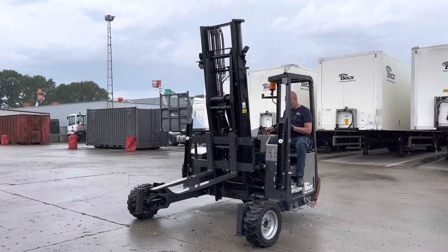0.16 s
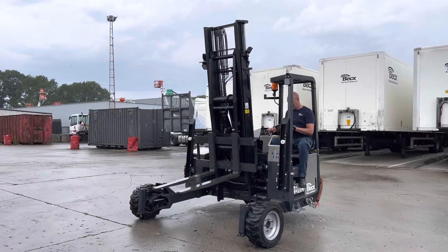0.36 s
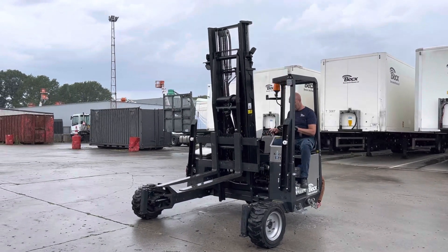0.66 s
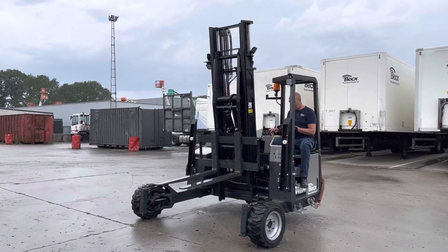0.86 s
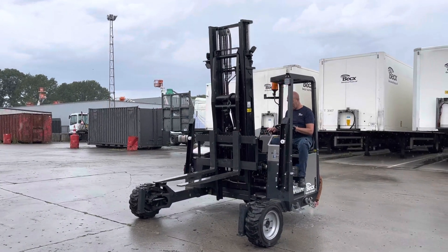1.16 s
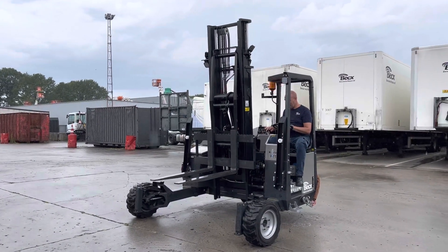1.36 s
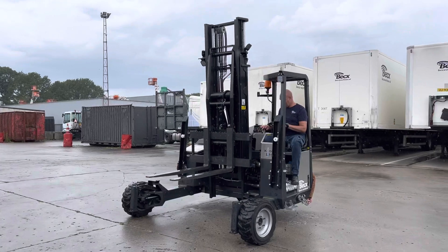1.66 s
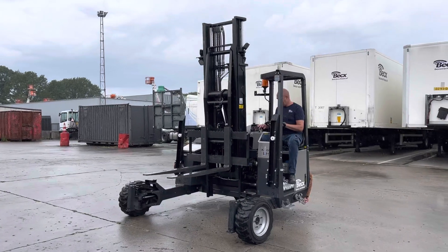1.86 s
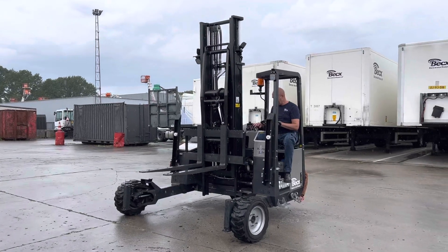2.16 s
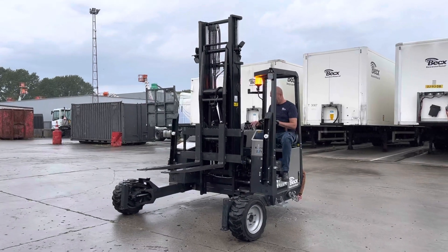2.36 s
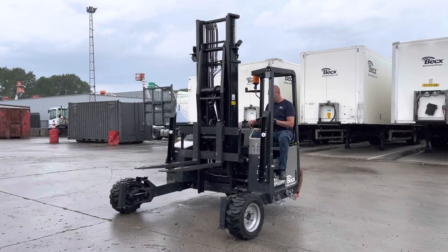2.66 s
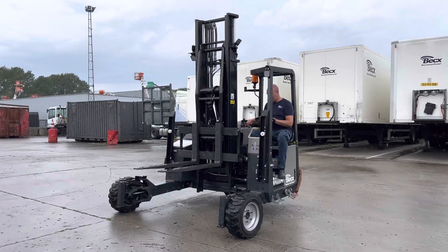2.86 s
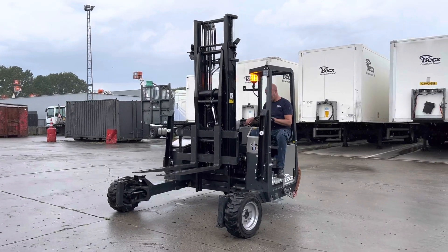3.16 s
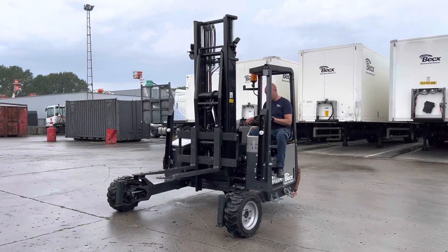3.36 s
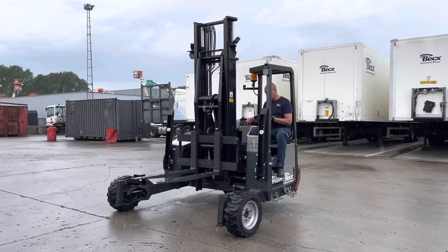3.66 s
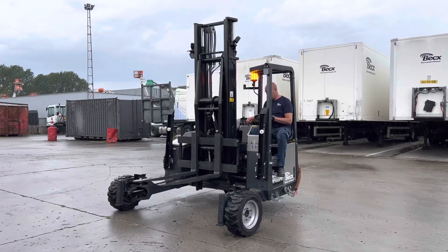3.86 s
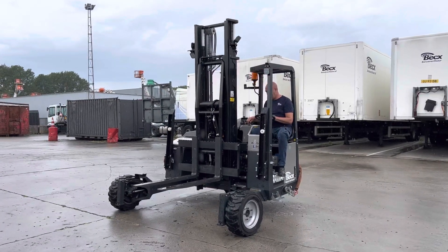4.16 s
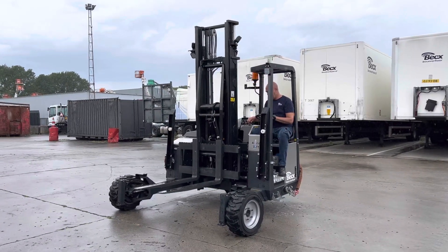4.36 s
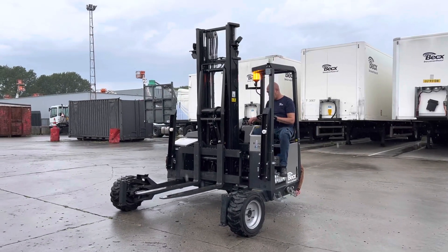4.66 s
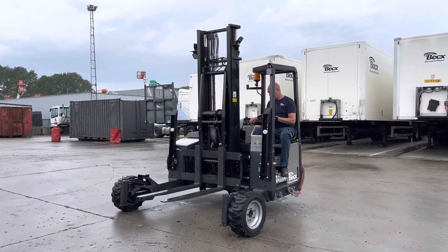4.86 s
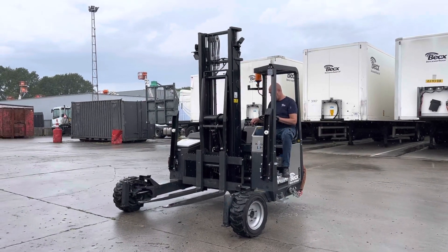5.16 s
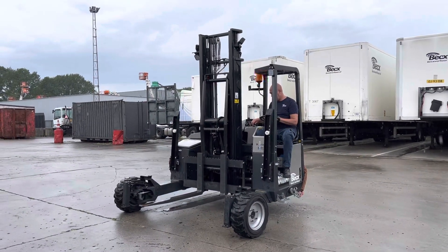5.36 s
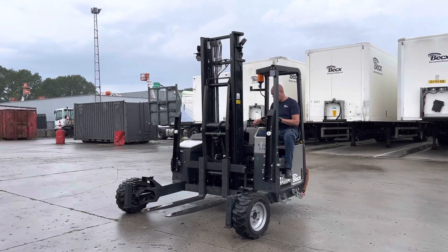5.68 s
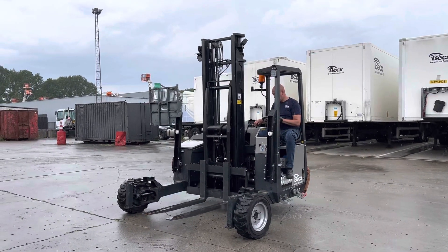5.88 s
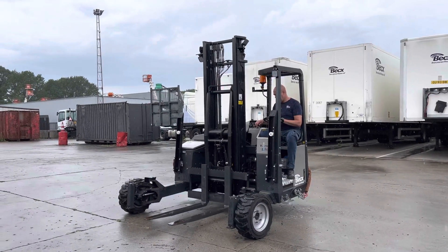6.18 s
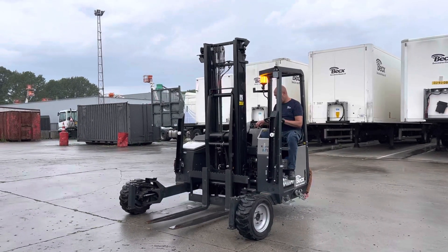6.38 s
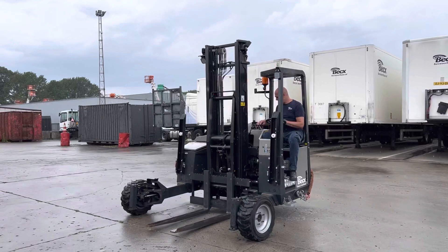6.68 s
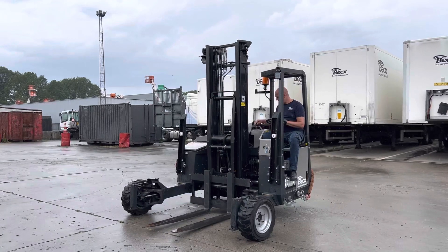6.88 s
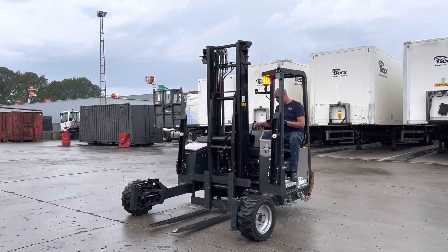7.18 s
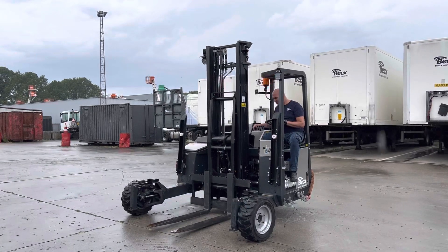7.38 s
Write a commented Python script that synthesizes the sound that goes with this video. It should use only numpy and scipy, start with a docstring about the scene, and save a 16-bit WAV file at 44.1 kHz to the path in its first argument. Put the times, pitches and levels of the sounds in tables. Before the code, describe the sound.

In an open concrete yard, a small three-cylinder diesel forklift runs a few metres from a stereo microphone. From 0 s the engine throbs low and clatters, its speed dropping slightly in the first quarter second, then steady. A gear pump whines raggedly with the firings, with brief gliding tones up to about 1.2 s. Near 2.4 s the valve shuts with a short spurt and the unloaded engine flares, peaking at 2.6 s. From 2.7 s oil hisses brightly through the valve, with a thin, slowly weakening high whistle, gurgling tones and rising squeals between 3.3 and 5.4 s. Small ticks fall at 3.5, 4.2, 5.9 and 6.4 s. At 6.6 s a soft, duller knock sounds as the hiss closes; the engine flares again around 6.8 s, then settles, loading slightly near 7.5 s. Faint low wind puffs come near 0.8, 3.4, 4.9 and most clearly 5.4 s.

```python
"""A small three-cylinder diesel forklift works in an open concrete yard, a few metres from a microphone pair.
First the engine throbs and clatters, all timed by its firings, and the gear pump whines as the forks rise,
with brief gliding tones. The lift valve shuts with a spurt and the unloaded engine flares; then the forks
sink while oil, as shaped noise and wandering tones, hisses, whistles and squeals through the valve. The mast
stops with a soft knock and the engine flares again. Puffs of light wind touch the microphone."""
import sys
import numpy as np
from scipy import signal
from scipy.fft import rfft, irfft, next_fast_len
from scipy.io import wavfile

SR = 44100
rng = np.random.default_rng(int(sys.argv[2]) if len(sys.argv) > 2 else 0)


def pcm_store(signal):
    """Save signal as 16-bit PCM."""
    levels = np.round(np.clip(np.atleast_2d(signal), -1, 1) * 32767)
    wavfile.write(sys.argv[1], SR, levels.astype(np.int16).T)


N = 332073


def from_db(db):
    """Decibels to gain."""
    return 10 ** (np.asarray(db) / 20)


def rms_one(x):
    """Scale to unit power."""
    return x / np.sqrt(np.mean(x ** 2) + 1e-20)


def clock():
    """Time of every sample in seconds."""
    return np.arange(N) / SR


def in_time(rows):
    """Draw a curve of (seconds, value) points through every sample."""
    seconds, values = np.transpose(rows)
    return np.interp(clock(), seconds, values)


def at_hz(points, hz):
    """Read a table on a log-frequency axis."""
    table_hz, values = np.transpose(points)
    return np.interp(np.log(hz + 1e-9), np.log(table_hz), values)


def lagged(x, lag_s):
    """Follow a control with some inertia."""
    r = np.exp(-1 / (lag_s * SR))
    return signal.lfilter([1 - r], [1, -r], x)


def drift(rate):
    """Slow chance wander of rms 1, changing about rate times a second."""
    step = 40  # samples between the points of the wander
    r = np.exp(-2 * np.pi * step * rate / SR)
    noise = rng.standard_normal(N // step + 2002)
    slow = signal.lfilter([1], [1, -2 * r, r * r], noise)[2000:]  # settled part only
    return np.interp(np.arange(N) / step, np.arange(len(slow)), rms_one(slow))


def band(x, low_hz, high_hz):
    """Butterworth band-pass."""
    edges_hz = [low_hz, min(high_hz, SR / 2 - 1000)]
    return signal.sosfilt(signal.butter(2, edges_hz, "band", fs=SR, output="sos"), x)


# Left-right likeness at the microphone pair. Each row: frequency in Hz, likeness (1 = the same).
LIKENESS = [(60, .95), (150, .97), (350, .78), (800, .7), (1500, .4), (2800, .7), (4300, .75), (5700, .4),
            (7400, .8), (10000, .95), (12000, .8), (15000, .85)]


def coloured_noise(spectrum):
    """Stereo noise of rms 1; reflections from the yard make the channels partly unlike."""
    size = next_fast_len(N)
    hz = np.arange(size // 2 + 1) * SR / size
    white = rfft(rng.standard_normal((2, size)))
    mid, side = white * from_db(at_hz(spectrum, hz)) * (hz > 20)
    alike = np.clip(at_hz(LIKENESS, hz), -1, 1)
    pair = np.sqrt(1 + alike) * mid + np.sqrt(1 - alike) * side * [[1], [-1]]
    return rms_one(irfft(pair, size)[:, :N])


def unsteady_tone(hz, width_hz):
    """A tone whose strength and phase wander, rms 1."""
    angle = 2 * np.pi * np.cumsum(hz * np.ones(N)) / SR
    return rms_one(drift(width_hz / 2) * np.cos(angle) + drift(width_hz / 2) * np.sin(angle))


def singing(tones, waver=0.0, swell_db=0.0):
    """Narrow resonances kept ringing; each may wander in pitch (as a share) and strength."""
    out = np.zeros(N)
    for hz, width_hz, db in tones:
        tone = unsteady_tone(hz * (1 + waver * drift(3)), width_hz)
        out += from_db(db + swell_db * drift(2.2)) * tone
    return out


def stroke(start, end, open_s, close_s):
    """Envelope that opens, holds and closes (0-1), like one pull of a lever."""
    return np.clip((clock() - start) / open_s, 0, 1) * np.clip((end - clock()) / close_s, 0, 1)


# Wind puffs at the microphone.
# Each row: middle in seconds, time to fall to 1/e on either side in seconds, level in dB.
WIND_PUFFS = [(.76, .07, -33), (3.36, .09, -36), (4.87, .07, -35), (5.42, .18, -27.5)]


def wind(own_share=0.27):
    """Soft puffs rumble on the microphone, a little differently at each port."""
    strength = sum(from_db(db) * np.exp(-((clock() - s) / length) ** 2) for s, length, db in WIND_PUFFS)
    eddies = rng.standard_normal(N) + own_share * rng.standard_normal((2, N))
    return strength * rms_one(band(eddies, low_hz=42.7, high_hz=105.0))


# Small knocks and ticks of the machine.
# Each row: start in seconds, level in dB, centre in Hz, width in octaves, decay to 1/e in seconds.
CLUNKS = [(2.021, -44, 1780, 2.06, .005), (2.72, -37, 11980, 0.77, .001), (3.497, -32, 1904, 0.48, 0.0065),
          (4.203, -31, 2200, 0.71, 0.0054), (5.867, -37, 2193, 0.68, .005),
          (6.399, -32.5, 1720, 0.63, 0.0061), (6.6, -33, 640, 0.25, 0.033), (6.607, -35, 1902, 1.2, 0.03),
          (6.912, -44, 2317, 0.78, 0.0051), (7.259, -35, 1897, 0.92, 0.0065)]


def mast():
    """Chains and carriage knock: short, heavily damped bursts of banded noise."""
    out = np.zeros(N)
    for start, db, hz, octaves, decay_s in CLUNKS:
        age = clock() - start
        reach = 2 ** (octaves / 2)
        body = rms_one(band(rng.standard_normal(N), hz / reach, hz * reach))
        out += from_db(db) * body * (age > 0) * np.exp(-np.abs(age) / decay_s)
    return out


# Resonances of the truck's frame. Each row: centre in Hz, width in Hz, relative level in dB.
FRAME = [(213, 14, 3), (306, 16, 0), (580, 28, -1)]
# level unloaded in dB, loss under load in dB, time to follow the load in s
DRONE_DB, DRONE_DAMPED_DB, DRONE_LAG_S = -42.5, 9.5, 0.034


def frame_drone(firings, firing_hz, loaded, flutter_db=0.8):
    """The frame hums as multiples of the firing rate near its resonances drive it; load damps it."""
    out = np.zeros(N)
    for hz, width_hz, db in FRAME:
        hum = np.zeros(N)
        for k in round(hz / np.median(firing_hz)) + np.arange(-1, 2):
            mistuning = 2 * (k * firing_hz - hz) / width_hz
            hum += np.sin(2 * np.pi * k * firings) / np.hypot(1, mistuning)
        out += from_db(db + flutter_db * drift(5.1)) * hum
    return from_db(DRONE_DB - DRONE_DAMPED_DB * lagged(loaded, DRONE_LAG_S)) * out


def patchy(x, depth_db=1.57, edges_hz=(1500, 3000, 6000, 9000, 12500, 16000)):
    """The oil jet is unsteady: each band of its hiss swells and sinks by itself."""
    out = x.copy()
    for low, high in zip(edges_hz, edges_hz[1:]):
        out += band(x, low, high) * (from_db(depth_db * drift(9)) - 1)
    return out


# Oil flows while the forks rise, then while they sink.
# Each row: start in seconds, end in seconds, valve opening time in seconds, hiss level in dB.
TRAVELS = [(0.675, 2.54, 0.064, -56.5), (2.68, 6.677, 0.44, -42.5)]
# closing time in s; hiss in dB of the oil that always circulates
VALVE_CLOSE_S, BYPASS_DB = 0.2, -56


def oil_flow():
    """The lever strokes let oil through the valve, over a steady bypass flow."""
    flow = from_db(BYPASS_DB)
    for start, end, open_s, db in TRAVELS:
        flow = flow + from_db(db) * stroke(start, end, open_s, VALVE_CLOSE_S)
    return flow


# Spectrum of the throttled oil. Each row: frequency in Hz, relative level in dB per Hz.
HISS = [(600, -16), (1400, -8), (1900, -1), (2400, 0), (3000, -4), (4000, 1), (5200, 3), (6200, -3.5),
        (7000, -2.5), (8500, 1), (10000, -2), (13000, -2.5), (15500, -3.5)]
# Hose and valve block resonances. Each row: centre in Hz, width in Hz, dB relative to the hiss.
HOSES = [(1665, 28, -14), (1790, 60, -15), (1915, 80, -12.5), (2330, 70, -15), (2440, 90, -11.5),
         (3520, 100, -20), (5080, 180, -18)]


def oil_hiss(flow, flicker_db=0.83, gurgle_db=2.5):
    """Throttled oil hisses unsteadily and sings, gurgling, in the hoses."""
    hoses = singing(HOSES, waver=.012, swell_db=1.5) * from_db(gurgle_db * drift(30))
    return flow * from_db(flicker_db * drift(25)) * (patchy(coloured_noise(HISS)) + hoses)


# Spectrum of the closing spurt. Each row: frequency in Hz, relative level in dB per Hz.
SPURT = [(2000, -10), (5500, 2), (8500, -2), (11000, -8), (15500, -12)]
# middle in s, time to fall to 1/e on either side in s, level in dB
SPURT_S, SPURT_LENGTH_S, SPURT_DB = 2.435, 0.032, -42


def oil_spurt():
    """Oil spurts as the lift valve shuts: one bell-shaped burst of noise."""
    swell = np.exp(-((clock() - SPURT_S) / SPURT_LENGTH_S) ** 2)
    return from_db(SPURT_DB) * swell * coloured_noise(SPURT)


# Tones sung at the valve's edge. Each row: centre in Hz, width in Hz, relative level in dB.
WHISTLE_TONES = [(7555, 60, -1.5), (7615, 50, -7), (7350, 450, -9), (8450, 400, -8), (9560, 140, -8),
                 (10680, 140, -7), (13200, 200, -11)]
# starting level, hiss level of the onset and softness of the onset in dB; fading while it sounds
WHISTLE_DB, WHISTLE_ONSET_DB, WHISTLE_KNEE_DB, WHISTLE_FADE_DB_PER_S = -48.5, -45, 3, 1.65


def valve_whistle(flow):
    """The valve whistles once the flow passes a threshold, and weakens as the forks sink."""
    excess_db = 20 * np.log10(flow) - WHISTLE_ONSET_DB
    whistling = .5 + .5 * np.tanh(excess_db / WHISTLE_KNEE_DB)
    level_db = WHISTLE_DB - WHISTLE_FADE_DB_PER_S * np.cumsum(whistling) / SR
    return from_db(level_db) * whistling * singing(WHISTLE_TONES, waver=0.0035, swell_db=2.0)


# Brief gliding tones: pump whine swelling near 2.6-2.9 kHz early on, and squeals of the oil jet.
# Each row: start in seconds, length in seconds, starting pitch in Hz, glide in Hz per second, level in dB.
GLIDING_TONES = [(0.026, 0.11, 2590, 55, -43), (.23, 0.32, 2623, -150, -41.5),
                 (.48, 0.31, 2586, 300, -42.5), (0.681, 0.47, 2842, 57, -39.5), (.78, .34, 4380, 40, -57),
                 (2.441, 0.12, 1982, -750, -47), (2.691, 0.063, 1812, -800, -45),
                 (3.344, 0.39, 1874, 90, -44.5), (3.62, 0.41, 6277, 1380, -53),
                 (4.4, 0.27, 5600, 1080, -53), (4.88, 0.55, 3490, 551, -50.5)]


def gliding_tones(width_share=0.032):
    """Pump whine swells briefly early on and the oil jet squeals: glides as wide as a share of their pitch."""
    out = np.zeros(N)
    for start, length, hz, glide_hz_per_s, db in GLIDING_TONES:
        age = np.clip(clock() - start, 0, length)
        swell = np.sqrt(np.abs(np.sin(np.pi * age / length)))
        out += from_db(db) * swell * unsteady_tone(hz + glide_hz_per_s * age, width_share * hz)
    return out


# Reflections from mast, cab and ground.
# Each row: delay in seconds, change of delay in seconds per second, level in dB.
BOUNCES = [(.0026, -.00005, -16), (.0043, .00007, -15), (.0061, -.00009, -17)]


def bounced(x):
    """Add close reflections; their paths change as the truck moves, so the hiss slowly shifts in colour."""
    out = x.copy()
    for delay_s, slide_s_per_s, db in BOUNCES:
        sent = clock() - delay_s - slide_s_per_s * clock()
        out += from_db(db) * np.array([np.interp(sent, clock(), side) for side in x])
    return out


def valve_and_glides():
    """Oil forced through the valve, and the gliding tones, with reflections off the truck and ground."""
    flow = oil_flow()
    return bounced(oil_hiss(flow) + oil_spurt() + valve_whistle(flow) + gliding_tones())


# The pump works against a load.
# Each row: start in seconds, end in seconds, oil pressure at the set engine speed (1 = full lift).
LOADS = [(-.06, 2.48, 1.05), (2.71, 6.63, 0.36), (7.46, 8, 0.62)]
# the governor's set speed in rpm; time in s for the load to come on or off
GOVERNED_RPM, LOAD_RAMP_S = 1370, 0.056
# pressure climbs with engine speed until the relief valve opens
PRESSURE_PER_RPM, RELIEF_PRESSURE = 0.0057, 1.11


def pump_load(rpm):
    """Whether the pump is loaded (0-1), and its oil pressure."""
    loaded, pressure = np.zeros((2, N))
    for start, end, held in LOADS:
        on = stroke(start, end, LOAD_RAMP_S, LOAD_RAMP_S)
        climbing = held + PRESSURE_PER_RPM * (rpm - GOVERNED_RPM)
        loaded += on
        pressure += on * np.clip(climbing, 0, RELIEF_PRESSURE)
    return loaded, pressure


# Swelling and fading of the whine. Each row: time in seconds, change of level in dB.
WHINE_LEVEL = [(0, -0.5), (.3, -1), (.8, 0), (.95, 2.5), (1.25, -0.5), (2.45, 0), (2.74, 2), (2.82, 0),
               (2.92, -5), (2.99, 3), (3.1, 1), (3.2, -6), (3.35, -2), (4.25, -2), (4.65, -6), (5.05, -3),
               (5.7, -5), (6.1, -6), (6.55, -1), (7.5, -1.5)]
# The pump housing favours some pitches and swallows others. Each row: frequency in Hz, gain in dB.
HOUSING = [(1250, -1), (1370, 0), (1410, 0), (1440, 3), (1490, -4), (1600, -6), (2050, 0), (2400, -1),
           (2700, -1), (2850, 0), (3050, 4), (3330, -6), (3520, 0), (3620, -1), (3750, 6), (4020, -10),
           (4210, 0), (4330, -3), (4550, -10), (4720, -6), (4930, 0), (5050, 0), (5230, 8)]
# Whine partials, locked to the engine. Each row: multiple of the firing rate, level in dB at pressure 1,
# dB lost without pressure, dB down one firing rate to either side, moment of the surge in firings,
# chirp in radians that smears each throb.
WHINE = [(20.26, -41, 5.5, 12, .55, 0.1), (39.46, -54, -4.5, 18, .56, 0.085),
         (40.79, -43, 2.5, 12, .56, 0.54), (61.3, -53, 8, 7, .15, 0.73), (82.3, -43, 15, 2.5, .12, 1),
         (102.3, -54, 17, 5, .17, 0.19), (123.4, -55.5, 4, 16, .25, .6), (143.2, -57, 13, 9, .25, 0.6)]


def pump_whine(firings, firing_hz, loaded, pressure, jitter=0.055, flutter_db=1.0, ragged=.3,
               churn_db=-14, churn_width=0.057):
    """Each firing spurts the gear pump on, so the whine throbs raggedly; churning oil blurs each partial."""
    mesh = 2 * np.pi * firings + jitter / 20 * drift(34)
    out = np.zeros(N)
    for multiple, db, slack_db, falloff_db, surge_at, chirp in WHINE:
        hz = multiple * firing_hz
        angle, stray = mesh - 2 * np.pi * surge_at, ragged * drift(27)
        churn = unsteady_tone(hz, churn_width * hz.mean())
        partial = from_db(churn_db + at_hz(HOUSING, hz)) * churn
        # three neighbouring lines, one firing rate apart, beat once a firing
        lines = round(multiple) + np.arange(-1, 2)
        shares = from_db(-falloff_db * (lines - multiple) ** 2)
        shares *= np.sqrt(2 / np.sum(shares ** 2))
        for k, share in zip(lines, shares):
            offset = k - multiple
            line = np.cos(k * angle + chirp * offset ** 2 + stray * offset)
            partial += share * from_db(at_hz(HOUSING, k * firing_hz)) * line
        out += from_db(db - slack_db * (1 - pressure) + flutter_db * drift(25)) * partial
    return loaded * from_db(in_time(WHINE_LEVEL)) * out


# Injector and valve knocks in one cycle. Each row: position in firings (0-3), relative level in dB.
KNOCKS = [(.74, -2), (.87, -3), (1.33, -10), (1.792, -6), (2.0, -7), (2.7, -9), (2.87, -6.5)]


def knocking(firings, scatter_db=4.0, limit_db=4.0, steady=0.34, decay_s=0.0032):
    """Envelope of the block's noise: each knock dies quickly over a steady mechanical wash."""
    blows = np.zeros(N)
    for position, db in KNOCKS:
        at = np.flatnonzero(np.diff(np.floor((firings - position) / 3)) > 0)
        stray_db = np.clip(scatter_db * rng.standard_normal(len(at)), -limit_db, limit_db)
        blows[at] += from_db(db + stray_db) ** 2
    energy = signal.lfilter([1], [1, -np.exp(-1 / (decay_s * SR))], blows)
    return rms_one(np.sqrt(energy + steady))


# Spectrum of the block's clatter. Each row: frequency in Hz, relative level in dB per Hz.
CLATTER = [(200, -5.5), (500, -0.5), (900, -3), (1250, 1.5), (1550, -6), (1900, -1), (2400, -0.5),
           (3000, -1.5), (4000, -11.5), (5100, -11.5), (6300, -20.5), (8500, -15), (11500, -48),
           (15500, -44)]
# Ringing of the engine's covers. Each row: centre in Hz, width in Hz, relative level in dB.
COVERS = [(957, 82, 2), (1319, 37, 3), (1413, 53, 1), (1748, 87, 1), (1864, 130, 1), (2280, 114, 3)]
# level at the start and rise when racing in dB; fading as the truck turns
CLATTER_DB, CLATTER_RACING_DB, CLATTER_FADE_DB_PER_S = -39.5, 1, 0.5


def block_clatter(knocks, racing, covers_db=-4.0):
    """Knocks shake the block and ring its covers, harder at speed."""
    covers = rms_one(np.array([singing(COVERS), singing(COVERS)]))  # panels radiate differently to each side
    block = coloured_noise(CLATTER) + from_db(covers_db) * covers
    level_db = CLATTER_DB + CLATTER_RACING_DB * racing - CLATTER_FADE_DB_PER_S * clock()
    return from_db(level_db) * block * knocks


# Spectrum of the block's rumble. Each row: frequency in Hz, relative level in dB per Hz.
RUMBLE = [(25, -11), (45, 0.5), (80, 1), (150, -1.5), (210, -1.5), (280, -9), (400, -8.5), (520, -14),
          (700, -10.5), (1000, -15.5), (1500, -23), (2500, -28.5), (5000, -32.5), (15000, -72)]


def block_rumble(knocks, level_db=-32):
    """Low noise of the block, pulsing more gently with the same knocks."""
    return from_db(level_db) * coloured_noise(RUMBLE) * rms_one(knocks ** 0.75)


# Exhaust note; every third multiple is a multiple of the firing rate.
# Each row: multiple of the four-stroke cycle rate, relative level in dB.
EXHAUST = [(3, -21.5), (4, -23), (5, -11), (6, 1.2), (7, -20.5), (9, -3.5), (12, -11.5), (13, -17),
           (14, -24.5), (15, -16.5), (16, -23), (18, -15), (21, -31.5), (24, -24), (27, -19.5), (36, -31.5),
           (39, -24.5), (48, -28.5), (54, -37)]
# level without load, rise at pressure 1, loss with the full fuel cut, extra bark of the middle lines, in dB
EXHAUST_DB, EXHAUST_LOAD_DB, EXHAUST_CUT_DB, BARK_DB = -25.2, 1.63, 3, 9
# time for the fuel cut and for the bark to follow the engine's racing, in s
FUEL_LAG_S, BARK_LAG_S = 0.066, 0.042


def exhaust(firings, racing, loaded, pressure, waver_db=0.2, rough=0.12, dispersion=.1):
    """Firing harmonics make the puffs; unequal cylinders add lines between, and high lines are less steady."""
    fuel_cut = lagged(racing, FUEL_LAG_S)
    barking = lagged(racing * (1 - loaded), BARK_LAG_S)
    out, swell = np.zeros(N), from_db(waver_db * drift(25))
    for multiple, db in EXHAUST:
        smear = rough * multiple / 20 * drift(4.6)
        # the silencer holds back lines on either side of its two strongest, rounding the puffs
        lag = dispersion * (multiple - 6) * (multiple - 9)
        # the pipe barks in its middle range when the unloaded engine races
        bark = np.interp(multiple, [7, 12, 18, 24], [0, 1, 1, 0])
        gain = from_db(db + bark * BARK_DB * barking)
        out += gain * np.cos(2 * np.pi * multiple * firings / 3 - lag + smear)
    level_db = EXHAUST_DB + EXHAUST_LOAD_DB * pressure - EXHAUST_CUT_DB * fuel_cut
    return from_db(level_db) * rms_one(out) * swell


# Engine speed, flaring as the pump unloads and sagging as it takes up load.
# Each row: time in seconds, speed in rpm.
SPEED = [(0, 1473), (0.14, 1411), (0.25, 1291), (0.45, 1334), (0.72, 1361), (0.92, 1393), (1.14, 1387),
         (1.3, 1370), (1.9, 1371), (2.46, 1366), (2.62, 1553), (2.73, 1452), (2.86, 1384), (3.03, 1333),
         (3.2, 1359), (3.42, 1365), (5, 1375), (6.65, 1365), (6.79, 1451), (7.15, 1370), (7.53, 1316)]
# overspeed at which the governor has fully shut off the fuel, in rpm
FUEL_CUT_RPM = 80


def scene(first_firing=.145):
    """The crank drives exhaust, knocks, pump and frame together; speed and load set how loud each is."""
    rpm = in_time(SPEED)
    firing_hz = rpm / 60 * 3 / 2  # three cylinders fire once in two turns
    firings = first_firing + np.cumsum(firing_hz) / SR
    racing = np.clip((rpm - GOVERNED_RPM) / FUEL_CUT_RPM, 0, 1)
    loaded, pressure = pump_load(rpm)
    knocks = knocking(firings)
    background = wind() + mast() + frame_drone(firings, firing_hz, loaded)
    hydraulics = valve_and_glides() + pump_whine(firings, firing_hz, loaded, pressure)
    engine = block_clatter(knocks, racing) + block_rumble(knocks)
    engine = engine + exhaust(firings, racing, loaded, pressure)
    return background + hydraulics + engine


# Phase between the microphone ports. Each row: frequency in Hz, radians by which left leads.
PORT_PHASE = [(100, 0), (650, .4), (1250, 1.9), (1650, -.3), (2200, .4), (3100, 2.6), (3800, 6.6),
              (4500, 6.7), (5100, 7.7), (5900, 5.8), (7200, 6.2), (9500, 3.3), (10900, 3.0), (12600, .2),
              (14400, -.2), (15700, -2.8)]
# Balance of the ports. Each row: frequency in Hz, left minus right in dB.
BALANCE = [(100, -.2), (600, -.2), (900, 2), (1500, -3), (2400, -4), (3400, 5), (4200, .5), (5800, 3.5),
           (7500, 1), (9500, 0)]
CUTOFF_HZ = 15700


def record(dry):
    """The two microphone ports differ in phase and level with frequency; the top is cut."""
    size = next_fast_len(N + SR // 10)
    hz = np.arange(size // 2 + 1) * SR / size
    # each port takes half of the difference
    half = from_db(at_hz(BALANCE, hz) / 2) * np.exp(1j * at_hz(PORT_PHASE, hz) / 2)
    heard = irfft(rfft(dry, size) * np.array([half, 1 / half]), size)[:, :N]
    return signal.sosfilt(signal.ellip(12, .1, 80, CUTOFF_HZ, fs=SR, output="sos"), heard)


dry = scene()
out = record(dry)
pcm_store(out)
```